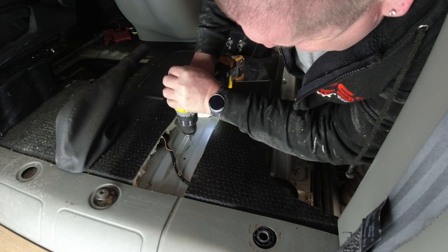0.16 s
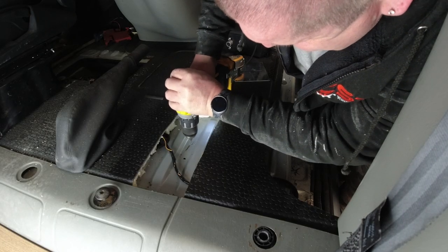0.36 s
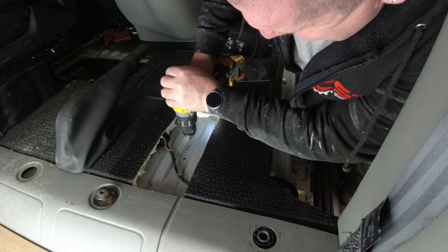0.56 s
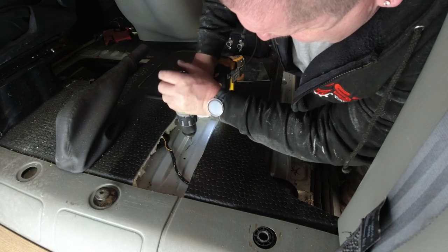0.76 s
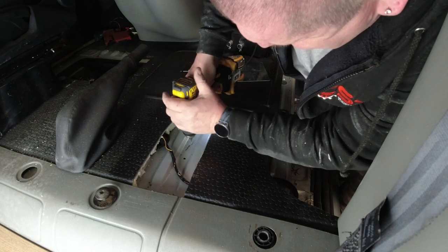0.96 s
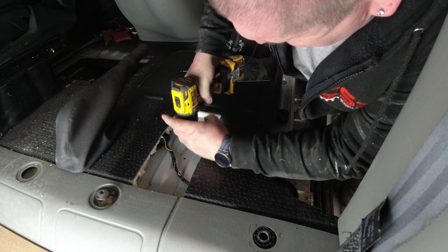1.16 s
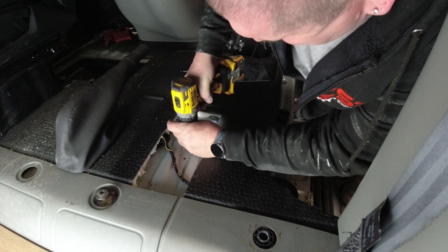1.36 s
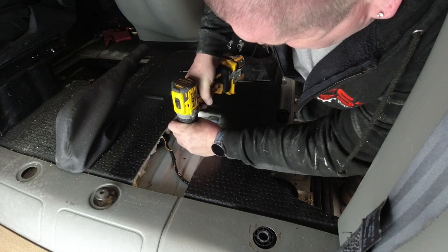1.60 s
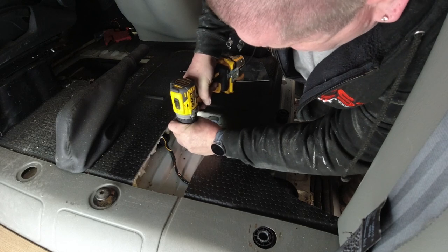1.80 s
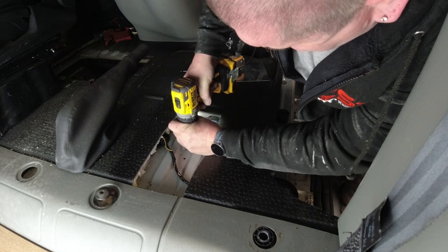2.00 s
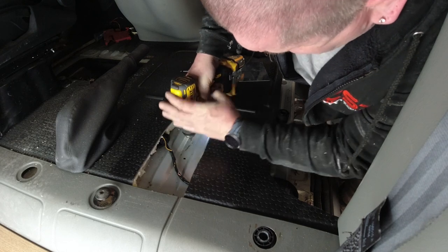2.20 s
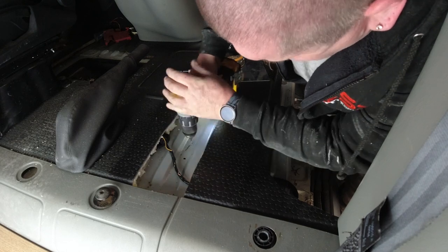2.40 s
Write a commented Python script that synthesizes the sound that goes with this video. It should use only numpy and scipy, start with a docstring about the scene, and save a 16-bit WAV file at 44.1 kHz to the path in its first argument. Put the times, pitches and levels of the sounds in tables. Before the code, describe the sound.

Cordless drill cuts sheet metal in a short harsh burst, hands bump, a lighter whirr follows

```python
"""A cordless drill bores a small hole through the steel floor of a van, heard from close by inside the cab.
It creeps, speeds up and cuts with a squeal, catches as it breaks through and stops. Hands shift and bump it,
then a second, lighter burst clears the hole with a rising and falling gear whine. Gears and whine follow one
shaft speed; cutting is a shower of tiny fractures, squeals are unsteady tones, and catches and bumps are
fading rings. Shaped noise makes the rubbing, the boom and the air; a short echo adds the cab."""
import sys
import numpy as np
from scipy import signal
from scipy.fft import rfft, irfft, next_fast_len
from scipy.io import wavfile
from scipy.ndimage import map_coordinates

SR = 44100
rng = np.random.default_rng(int(sys.argv[2]) if len(sys.argv) > 2 else 0)


def to_wav(sig):
    """Store sig (one row per channel, or 1-D mono) as 16-bit WAV at the path in sys.argv[1].

    Samples outside -1..1 are clipped; the rate is SR.
    """
    pcm = np.clip(np.atleast_2d(sig), -1, 1) * 32767
    pcm = np.round(pcm).astype(np.int16)
    wavfile.write(sys.argv[1], SR, pcm.T)  # frames by channels


N = 108045  # length in samples

# boom of the van's body over time: t/s, level/dB
BOOM_LEVEL = [(0, -54), (.2, -55.5), (.32, -51), (.43, -57), (.48, -40), (.6, -44), (.68, -61), (.9, -61),
              (1.31, -71), (1.34, -47.5), (1.45, -59.5), (1.78, -75), (1.92, -59.5), (2.45, -65)]
# spectrum of the boom: f/Hz, level/dB
BOOM_SPECTRUM = [(25, -13), (45, -8), (58, 3), (76, -16), (130, -21), (400, -51), (1500, -100)]
# spectrum of the steady air noise: f/Hz, level/dB
AIR_SPECTRUM = [(47, -52), (80, -20), (130, -4), (224, -11), (655, -14), (833, -19.5), (1910, -23),
                (2840, -28.5), (15000, -55)]
AIR_DB = -70.5
# how much of the scattered sound goes to the sides: f/Hz, level/dB
SIDE_SPECTRUM = [(250, -32), (450, -29.5), (700, -17.5), (1250, -6), (2400, -7.5), (4400, -0.5),
                 (9000, -4.5), (14000, 1)]
CAB_T60_S, CAB_DB = 0.2, -10  # time for the echo to fall 60 dB, and its level
TOP_HZ = 15900  # nothing is left above this

# sleeve and hand rub: start t/s, length t/s, centre f/Hz, level/dB
RUBS = [(0.79, 0.44, 990, -70), (.991, 0.012, 860, -57.5), (0.99, 0.13, 320, -56.5),
        (0.827, 0.34, 2740, -77), (1.186, 0.21, 3700, -80), (1.43, 0.18, 3900, -83),
        (2.268, 0.058, 485, -56), (2.302, 0.01, 650, -51.5), (2.335, 0.056, 9700, -63.5),
        (2.316, 0.11, 3400, -71.5)]
RUB_Q = 1.4  # centre frequency divided by bandwidth
# hands bump the drill against the floor: t/s, level/dB, attack t/s, brightness/(dB per octave)
BUMPS = [(.789, -49, .004, -5), (.897, -52, .003, 0), (.907, -42, .0006, 0), (1.034, -51, .007, -1),
         (1.05, -42.5, .002, -2), (1.075, -54, .005, -3), (1.325, -38, .0008, 0), (1.339, -39, .002, -1),
         (1.349, -40.5, .002, 0), (1.372, -53, .003, -6), (1.773, -61, .0005, 3), (2.062, -45, .003, 3),
         (2.305, -56, .0005, 3)]
# low floor modes that a bump rings: f/Hz, level/dB, 60 dB decay t/s
FLOOR_MODES = [(57.55, -27, 0.14), (135, -13, 0.11), (214, -2.5, 0.08), (295, -5, 0.08), (418, 1.5, 0.062),
               (515, -2.5, 0.055), (590, -12, 0.06), (720, -19, 0.05)]
TILT_PIVOT_HZ, MODE_SCATTER, BUMP_GRIT_DB = 400, .012, -22  # scatter is a share of the frequency

# faint, high, airy ring, perhaps of the chuck: start t/s, length t/s, centre f/Hz, width f/Hz, level/dB
HIGH_RINGS = [(2.2, 0.22, 10300, 1100, -75), (1.81, .4, 10250, 700, -65)]

# the bit catches or clicks on the steel: t/s, thud level/dB, crack level/dB, 60 dB decay t/s
CATCHES = [(.3875, -23.5, -34, 0.036), (0.455, -32, -57, 0.088), (0.626, -29, -27.5, 0.069),
           (0.654, -28.5, -24, 0.055), (0.683, -33, -38, 0.091), (0.814, -55, -44, 0.077),
           (1.324, -55.5, -53.5, 0.046), (1.564, -61.5, -65, 0.086)]
# spectrum of a crack: f/Hz, level/dB
CRACK_SPECTRUM = [(500, -2), (1500, -2), (2700, 0.5), (3900, 4), (5200, -5.5), (8000, -8.5), (10200, 2.5),
                  (12000, -13.5), (15500, -22)]
SOFT_DB, SOFT_HZ = -53, 5100  # cracks this weak or weaker are cut at SOFT_HZ; stronger ones reach higher
SNAP_DB, SNAP_T60_S = -1.5, .006  # the first instant of a crack
# a catch is too brief to move the whole panel: f/Hz, level/dB
THUD_LOW_CUT = [(100, -15), (220, -1.5), (350, -0.5)]

# squeal of the cutting edge: t/s, f/Hz, level/dB
SQUEAL = [(.262, 8700, -48), (.278, 9540, -34), (.292, 9690, -30), (.33, 9490, -36), (.355, 9480, -37),
          (.378, 9470, -28), (.396, 9440, -38), (.42, 9465, -33), (.435, 9450, -39), (.47, 9465, -35),
          (.5, 9430, -35.5), (.532, 8890, -38), (.572, 8750, -47)]
SQUEAL_JITTER = 0.003  # share of the frequency
# the bit chatters: start t/s, length t/s, f/Hz, level/dB
CHATTERS = [(0.145, 0.061, 4060, -48.5), (0.184, 0.064, 4036, -34), (0.22, 0.031, 3793, -30.5),
            (0.384, 0.021, 3950, -27), (0.396, 0.044, 4067, -27)]
CHATTER_JITTER, CHATTER_RASP, CHATTER_WIDTH_HZ = .02, .65, 650  # share of frequency, noise gain, width

# how hard the bit cuts: t/s, level/dB
CUT_LEVEL = [(.185, -68), (.22, -39), (.25, -28.5), (.29, -28.5), (.38, -27.5), (.44, -31.5), (.51, -29.5),
             (.58, -30.5), (.62, -37), (.68, -41), (.7, -44), (.74, -100), (1.8, -110), (1.84, -47.5),
             (1.92, -43.5), (1.99, -48.5), (2.06, -69.5)]
# shaking of the floor panel: t/s, level/dB
SHAKE_LEVEL = [(.19, -81), (.22, -36.5), (.3, -34.5), (.39, -34.5), (.42, -49), (.45, -42), (.462, -30),
               (.485, -44), (.51, -44.5), (.525, -30.5), (.6, -31.5), (.625, -38), (.645, -67), (.72, -68),
               (.8, -81), (1.8, -88), (1.85, -48.5), (1.93, -39), (1.97, -49), (2.18, -51.5), (2.22, -56)]
# hiss of the breaking chips: f/Hz, level/dB
SWARF_SPECTRUM = [(530, -47), (900, -9.5), (1260, -9.5), (1400, -14.5), (1710, -14), (2570, -13),
                  (3540, -5), (3940, -12), (4550, -11.5), (8340, -11), (9630, -17), (11200, -11),
                  (15500, -16)]
# resonances of the floor panel: f/Hz, width f/Hz, level/dB
PANEL_MODES = [(127, 18, -7.5), (230.3, 45, -7), (364.4, 9.2, -1), (413, 29, 1), (532, 35, -2),
               (627, 73, -7.5), (722, 97, -6.5), (792, 24, -2.5), (1230, 59, -12)]
# resonances of the bit: f/Hz, width f/Hz, level/dB
BIT_MODES = [(2250, 350, -2), (2512, 110, -2), (2639, 68, -0.5), (2820, 130, -5), (2936, 110, -4.5),
             (3250, 600, -4), (9900, 1300, 2.5)]
BIT_DB, BIT_SHIFT_DB, SWARF_DB = -3.5, 3, -6.5
CHIPS_PER_S, CHIP_SPREAD_DB = 5000, -0.5
LIP_TURNS, LIP_DEPTH = 5.6, .2  # one lip passes every LIP_TURNS turns of the motor shaft

# motor speed: t/s, shaft f/Hz
SPEED = [(0, 46), (.17, 47), (.22, 290), (.255, 405), (.29, 421), (.35, 415), (.5, 408), (.62, 370),
         (.69, 250), (.73, 20), (1.79, 20), (1.84, 186), (1.86, 217), (1.888, 226), (1.922, 221),
         (1.946, 206), (1.962, 187), (2.004, 140), (2.05, 107), (2.13, 140), (2.19, 120), (2.23, 18)]
# gearbox loudness, one list for each burst: t/s, level/dB
GEAR_RUNS = [
    [(0, -46.5), (.155, -49.5), (.185, -44.5), (.225, -31.5), (.26, -33), (.6, -34.5), (.67, -47),
     (.698, -32.5), (.72, -59.5), (.78, -55.5), (.85, -56.5)],
    [(1.77, -96.5), (1.8, -60.5), (1.818, -44), (1.84, -38.5), (1.93, -41.5), (2.04, -44.5), (2.1, -42.5),
     (2.185, -41.5), (2.212, -59), (2.25, -80.5)],
]
# spectrum of the gearbox: f/Hz, level/dB
GEARBOX_SPECTRUM = [(59, -40), (100, -12.5), (293, -12.5), (467, -2.5), (727, -6.5), (917, -15.5),
                    (1430, -12), (1730, -8.5), (1880, -11), (2220, -4.5), (2580, -12.5), (2750, -8.5),
                    (3250, -10.5), (3930, -4), (4370, -10.5), (5750, -21), (8770, -20), (10200, -18),
                    (15500, -49.5)]
# resonances of the housing: f/Hz, width f/Hz, level/dB
HOUSING_MODES = [(363, 30, -1.5), (509, 4.3, 7.5), (757, 17, -3.5), (1240, 27, -3), (1990, 60, -11),
                 (2574, 120, -3), (2940, 58, -5.5), (3900, 190, -5)]
# muffled tone of the creeping gears: f/Hz, level/dB
CRAWL_TONE = [(300, 2), (2700, 1), (4400, 1.5), (5500, -3), (7500, -4.5), (9000, -18.5), (14000, -40)]
# gear whine, loudest as the first burst gets up to speed, softer in the second: t/s, level/dB
WHINE_LEVEL = [(.22, -54), (.28, -36), (.4, -40), (.6, -54), (.72, -72), (1.8, -82), (1.845, -43.5),
               (1.92, -42), (1.97, -43.5), (2.04, -53), (2.22, -74)]
# gear tones: multiple of the shaft speed, level/dB
GEAR_TONES = [(2, -11), (8, -8), (11, -17), (15.5, -13), (16, -8), (20, -5), (22, -14), (24, -10),
              (26, -13), (31, -11)]
# how well the housing radiates a gear tone: f/Hz, level/dB
WHINE_TONE = [(200, -1), (1750, 1), (2300, -7), (2900, 2), (3550, 1), (3950, -6), (4450, 1), (5400, -5)]
TEETH, MESH_DEPTH, GEAR_ROUGH = 8, .5, .3  # the depths are shares of the noise strength
WEAR_SHARE, WEAR_TURNS = .5, 2  # power share of the repeating rattle, shaft turns before it repeats
WHINE_JITTER, WHINE_TOP_HZ = .002, 5860  # share of the shaft speed, upper edge of the whine
HOUSING_DB, CRAWL_DB, CRAWL_HZ = -25, -4.5, 93  # below this shaft speed the gears lose their treble
CHUCK_HZ, CHUCK_WIDTH_HZ, CHUCK_DB = 4150, 1100, -5.5
CHUCK_GRIP_HZ = 180  # above this shaft speed the chuck falls quiet


def amp(db):
    """Decibels to gain."""
    return 10 ** (np.asarray(db) / 20)


def unit(x):
    """Scale to rms 1."""
    return x / np.sqrt(np.mean(x ** 2) + 1e-20)


def clock():
    """Seconds at each sample."""
    return np.arange(N) / SR


def curve(rows, column=1):
    """Join the points of a table with straight lines, one value per sample."""
    rows = np.array(rows)
    return np.interp(clock(), rows[:, 0], rows[:, column])


def level(rows):
    """Gain from the last column; silent outside the rows."""
    inside = (clock() >= rows[0][0]) * (clock() <= rows[-1][0])
    return amp(curve(rows, -1)) * inside


def wobble(rate):
    """A smooth random curve with rate knots a second."""
    knots = rng.standard_normal(int(N * rate / SR) + 4)
    return map_coordinates(knots, [clock() * rate])


def filtered(x, response):
    """Multiply the spectrum of x by a response of frequency."""
    size = next_fast_len(N + SR // 2)
    spectrum = rfft(x, size) * response(np.fft.rfftfreq(size, 1 / SR))
    return irfft(spectrum, size)[..., :N]


def colour(x, points):
    """Shape x by a table of f/Hz, level/dB, joined on a log frequency scale."""
    f, db = np.transpose(points)
    return filtered(x, lambda hz: amp(np.interp(np.log(hz + 1), np.log(f + 1), db)))


def ring(x, modes):
    """Send x through a set of resonances with alternating signs, at rms 1."""
    def response(f):
        total = 0
        for k, (centre, width, db) in enumerate(modes):
            damping = 1j * f * width
            total = total + (-1) ** k * amp(db) * damping / (centre * centre - f * f + damping)
        return total
    return unit(filtered(x, response))


def dull(x, edge_hz):
    """Steep low-pass."""
    return filtered(x, lambda f: 1 / (1 + (f / edge_hz) ** 8))


def noise():
    """White noise."""
    return rng.standard_normal(N)


def band(hz, width):
    """Narrow noise of rms 1, from the same resonance used twice."""
    once = ring(noise(), [(hz, width, 0)])
    return ring(once, [(hz, width, 0)])


def phase(hz):
    """Running phase of a frequency curve, in radians."""
    return 2 * np.pi * np.cumsum(hz) / SR


def strike(start, attack, t60):
    """Envelope of a blow: a quick rise, then a fade of 60 dB in t60 seconds."""
    t = np.clip(clock() - start, 0, 1)
    return (1 - np.exp(-t / attack)) * np.exp(-np.log(1000) * t / t60)


def swell(start, length):
    """Envelope of a stroke: half a sine wave."""
    return np.sin(np.pi * np.clip((clock() - start) / length, 0, 1))


def background():
    """Low noise booms in the van's body over a steady, soft noise of air."""
    boom = level(BOOM_LEVEL) * unit(colour(noise(), BOOM_SPECTRUM))
    air = amp(AIR_DB) * unit(colour(noise(), AIR_SPECTRUM))
    return boom + air


def cab(x, t60):
    """A short diffuse echo of the cab: x smeared by fading noise."""
    t = np.arange(SR // 3) / SR
    tail = rng.standard_normal(len(t)) * np.exp(-np.log(1000) * t / t60) * (t > .001)
    return signal.fftconvolve(x, tail / np.linalg.norm(tail))[:N]


def rubbing():
    """Cloth and skin rub softly, each stroke a swell of noise around one pitch."""
    return sum(amp(db) * swell(start, length) * band(hz, hz / RUB_Q) for start, length, hz, db in RUBS)


def bumps():
    """Bumps ring the floor's low modes; a brightness tilt favours the low or the high ones."""
    out = np.zeros(N)
    grit = band(470, 423)
    for start, db, attack, tilt_db in BUMPS:
        bump = amp(BUMP_GRIT_DB) * strike(start, attack, 0.12) * grit
        for hz, mode_db, t60 in FLOOR_MODES:
            gain = amp(mode_db + tilt_db * np.log2(hz / TILT_PIVOT_HZ) + rng.normal())
            pitch = hz * (1 + MODE_SCATTER * rng.normal())
            tone = np.sin(2 * np.pi * pitch * (clock() - start))
            bump += gain * strike(start, attack, t60) * tone
        out += amp(db) * bump
    return out


def high_ring():
    """A faint, high, airy ring, perhaps of the chuck: narrow noise that swells and fades."""
    return sum(amp(db) * swell(start, length) * band(hz, width) for start, length, hz, width, db in HIGH_RINGS)


def catches():
    """Each catch is a sharp snap, a ringing crack and a thud of the panel."""
    out = np.zeros(N)
    for start, thud_db, crack_db, t60 in CATCHES:
        # the treble edge rises an octave for every 10 dB above SOFT_DB
        edge_hz = SOFT_HZ * 2 ** (max(crack_db - SOFT_DB, 0) / 10)
        crack = dull(unit(colour(noise(), CRACK_SPECTRUM)), edge_hz)
        thud = colour(ring(noise(), PANEL_MODES), THUD_LOW_CUT)
        snap = amp(SNAP_DB) * strike(start, 0.00013, SNAP_T60_S)
        envelope = strike(start, 0.00083, t60) + snap
        out += envelope * (amp(crack_db) * crack + amp(thud_db) * thud)
    return out


def squeal():
    """The cutting edge sticks and slips: a high tone with a slightly unsteady pitch."""
    pitch = curve(SQUEAL) * (1 + SQUEAL_JITTER * wobble(570))
    return level(SQUEAL) * np.sin(phase(pitch))


def chatter():
    """Stick and slip also gives short spells of a lower, wavering tone with raspy noise."""
    out = np.zeros(N)
    for start, length, hz, db in CHATTERS:
        pitch = hz * (1 + CHATTER_JITTER * wobble(350))
        tone = amp(2.9 * wobble(200.4)) * np.sin(phase(pitch))
        rasp = CHATTER_RASP * band(hz, CHATTER_WIDTH_HZ)
        out += amp(db) * swell(start, length) * (tone + rasp)
    return out


def chips():
    """Random tiny fractures of uneven size."""
    breaks = rng.random(N) < CHIPS_PER_S / SR
    return breaks * noise() * amp(CHIP_SPREAD_DB * noise())


def cutting():
    """Two lips break chips in turn: a hiss, shifting rings of the bit and a shaking floor panel."""
    lips = 1 + LIP_DEPTH * np.cos(phase(curve(SPEED) / LIP_TURNS) + wobble(40))
    bit = unit(sum(amp(db + BIT_SHIFT_DB * wobble(25)) * band(hz, width) for hz, width, db in BIT_MODES))
    hiss = unit(colour(chips(), SWARF_SPECTRUM))
    edge = amp(SWARF_DB) * hiss + amp(BIT_DB) * bit
    panel = ring(chips(), PANEL_MODES)
    return lips * (level(CUT_LEVEL) * edge + level(SHAKE_LEVEL) * panel)


def wear(turn, speed):
    """Uneven teeth repeat one rattle every few turns: a dense family of tones that glide with the shaft."""
    pattern = unit(irfft(np.exp(2j * np.pi * rng.random(size=101))))
    per_turn = len(pattern) / WEAR_TURNS
    place = turn / (2 * np.pi) * per_turn
    # louder as the pattern runs faster
    return map_coordinates(pattern, [place], mode="grid-wrap") * np.sqrt(speed * per_turn / SR)


def gear_rattle(turn, speed):
    """Meshing teeth shake the housing; at a creep the treble goes, at middle speeds the chuck rattles loosely."""
    mesh = (1 + MESH_DEPTH * np.cos(TEETH * turn)) * (1 + GEAR_ROUGH * np.cos(2 * turn))
    rattle = np.sqrt(WEAR_SHARE) * wear(turn, speed) + np.sqrt(1 - WEAR_SHARE) * noise() * mesh
    grind = unit(colour(rattle, GEARBOX_SPECTRUM))
    housing = ring(rattle, HOUSING_MODES)
    crawl = colour(housing + 0.54 * grind, CRAWL_TONE)
    chuck_grip = 1 + (speed / CHUCK_GRIP_HZ) ** 10
    chuck = amp(CHUCK_DB) * band(CHUCK_HZ, CHUCK_WIDTH_HZ) / chuck_grip
    fast = 1 / (1 + (CRAWL_HZ / speed) ** 8)  # near 0 at a creep, near 1 at full speed
    running = 0.74 * grind + amp(HOUSING_DB) * housing + chuck
    sound = fast * running + (1 - fast) * amp(CRAWL_DB) * crawl
    return sum(level(run) for run in GEAR_RUNS) * sound


def gear_whine(turn, speed):
    """The gears sing at multiples of the shaft speed, so the tones rise and fall with it."""
    whine = np.zeros(N)
    for multiple, db in GEAR_TONES:
        hz = multiple * speed
        radiated_db = np.interp(hz, *np.transpose(WHINE_TONE))
        gain = amp(db + 3 * wobble(55) + radiated_db) / (1 + (hz / WHINE_TOP_HZ) ** 10)
        whine += gain * np.sin(multiple * turn + 2 * np.pi * rng.random())
    return np.sqrt(2) * level(WHINE_LEVEL) * whine


def gears():
    """One slightly unsteady shaft turns both the rattle and the whine."""
    speed = curve(SPEED)
    turn = phase(speed * (1 + WHINE_JITTER * wobble(200)))
    return gear_rattle(turn, speed) + gear_whine(turn, speed)


def sources():
    """Everything that sounds in the cab, before its echo."""
    drill = gears() + cutting() + squeal() + chatter() + catches()
    return background() + rubbing() + bumps() + high_ring() + drill


def scene():
    """The drill in the middle; scattered sound with its own random grain widens mainly the treble."""
    direct = sources()
    mid = direct + amp(CAB_DB) * cab(direct, CAB_T60_S)
    side = colour(sources(), SIDE_SPECTRUM)
    return np.array([mid + side, mid - side])


def record(dry):
    """Fade the treble out over the last 200 Hz below TOP_HZ."""
    return filtered(dry, lambda hz: np.clip((TOP_HZ - hz) / 200, 0, 1))


dry = scene()
out = record(dry)
to_wav(out)
```